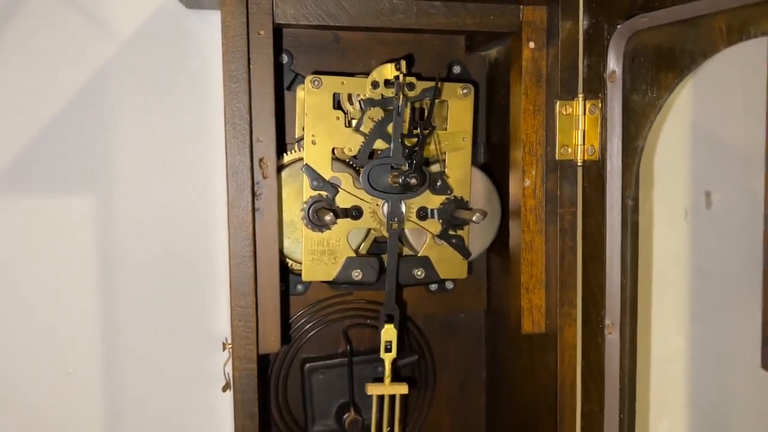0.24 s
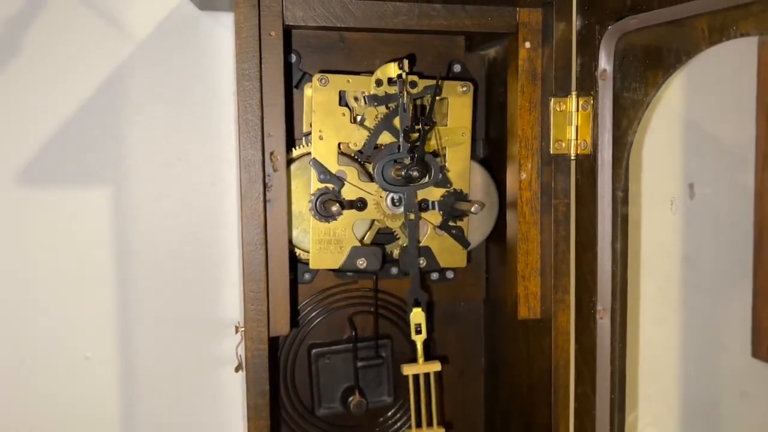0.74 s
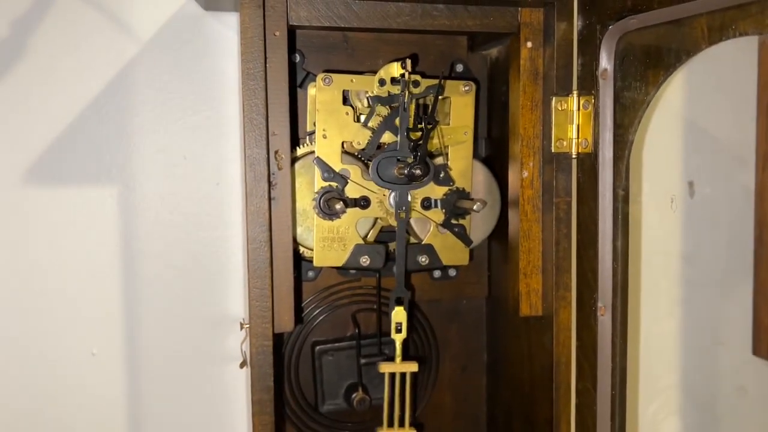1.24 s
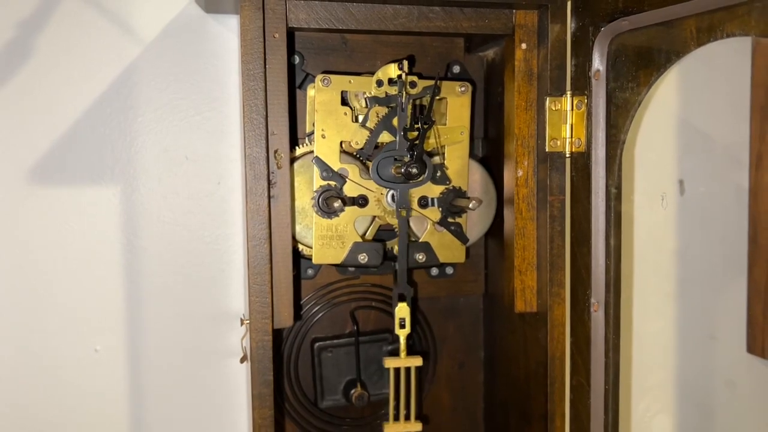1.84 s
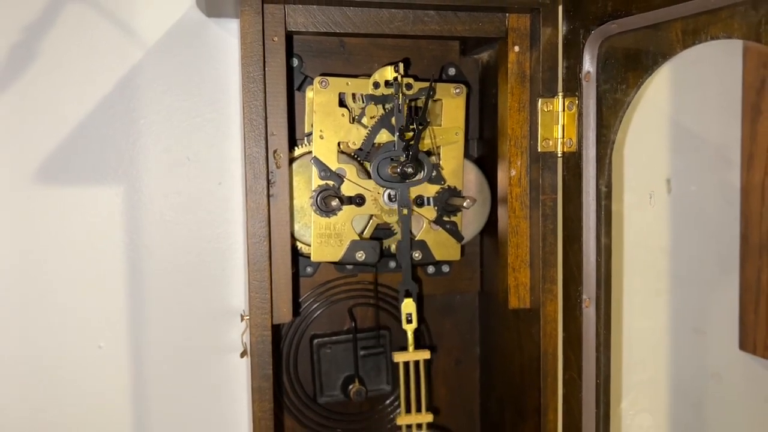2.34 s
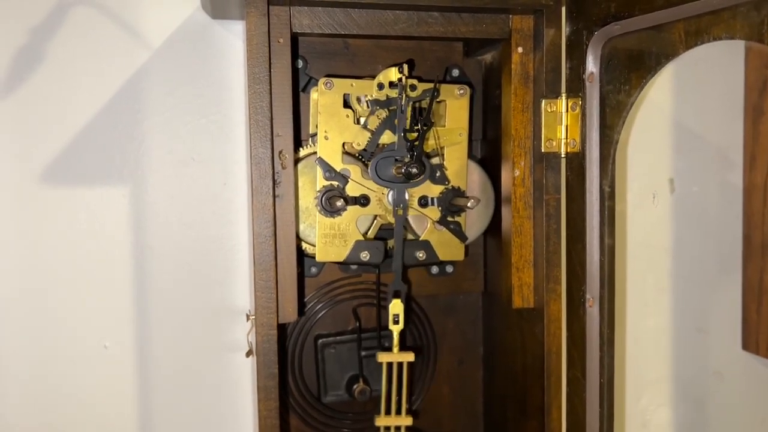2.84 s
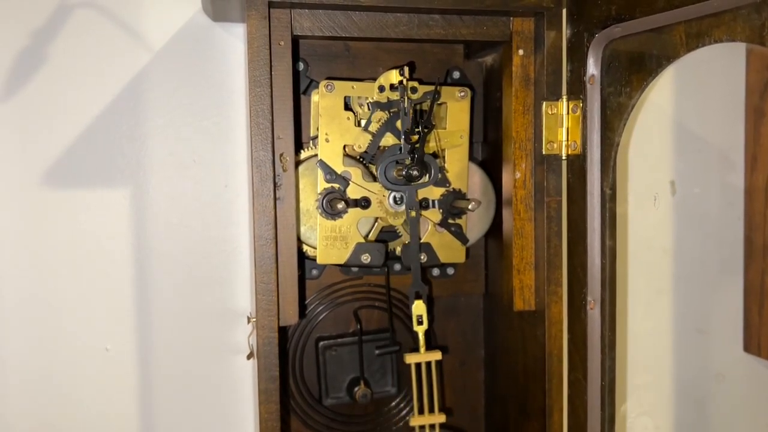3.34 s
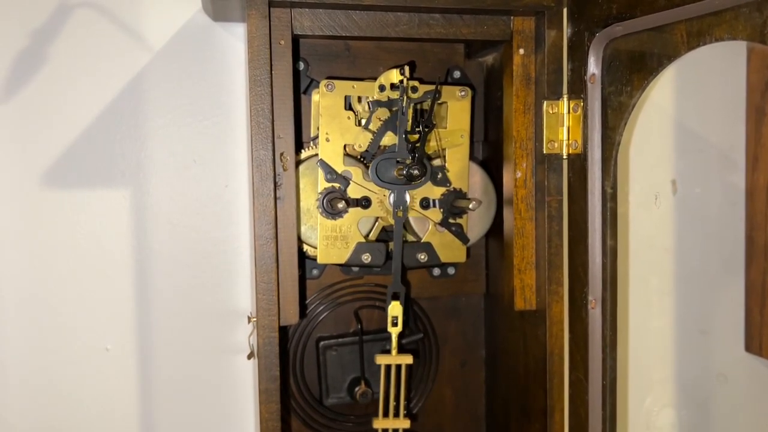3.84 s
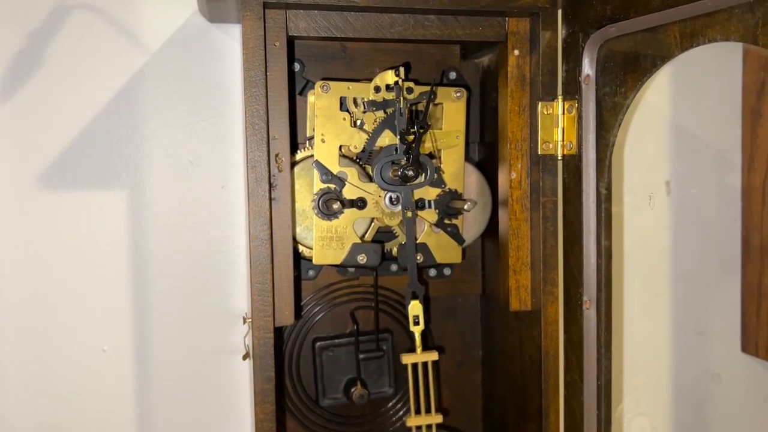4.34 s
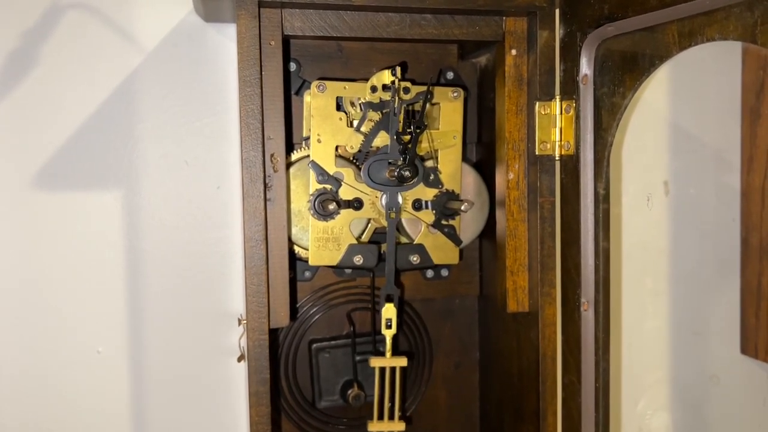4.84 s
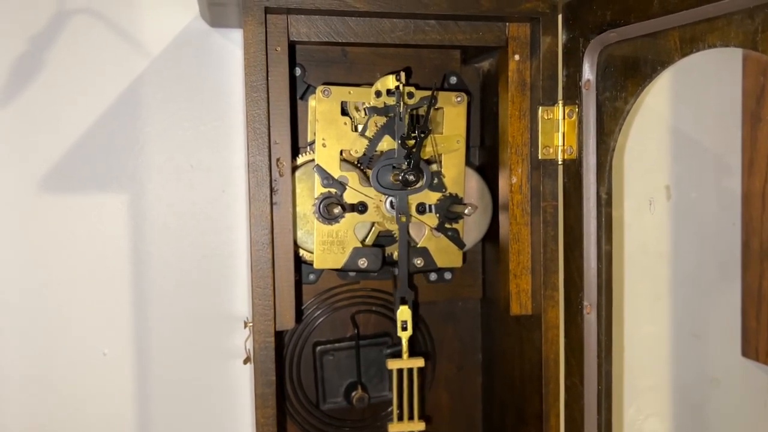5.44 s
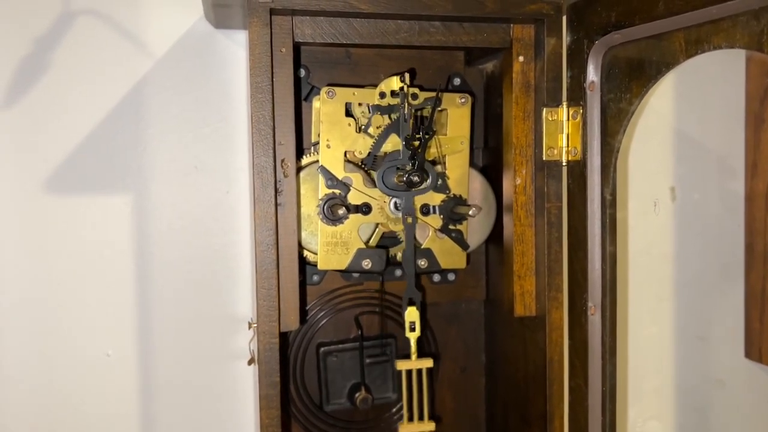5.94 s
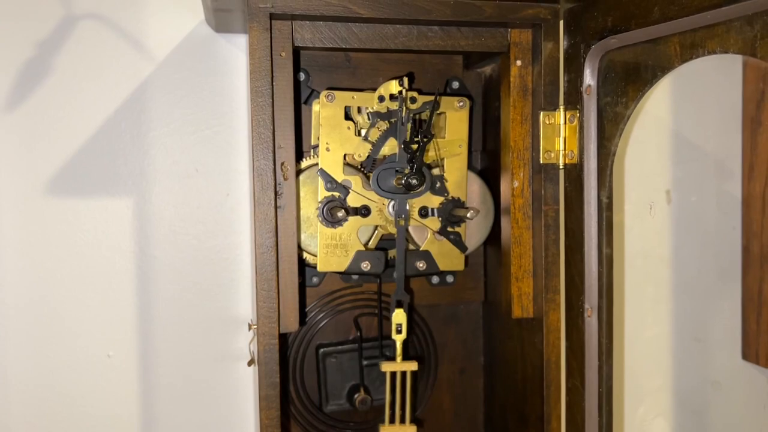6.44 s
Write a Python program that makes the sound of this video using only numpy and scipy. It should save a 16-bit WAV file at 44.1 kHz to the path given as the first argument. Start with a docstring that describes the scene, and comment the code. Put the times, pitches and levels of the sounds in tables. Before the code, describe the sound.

A wall clock strikes four evenly spaced ringing blows on a coiled wire gong, over a mechanical whirr, faint ticking and light clicks, close indoors.

```python
"""A pendulum wall clock strikes on a coiled wire gong, heard close by in a small room.
At first the last blow still rings, in slowly beating pairs of modes, over the steady whirr of the strike train.
Loose parts and pins ping at times, the escapement ticks, and a wheel scrapes once a turn.
Four blows follow: each restarts the coil, knocks the wooden case, cracks and buzzes the wire.
After each, the strike lever drops with a click: noise plus the ring of one brass part."""
import sys
import numpy as np
from scipy import signal
from scipy.fft import rfft, irfft, next_fast_len
from scipy.io import wavfile
from scipy.ndimage import uniform_filter1d

SR = 44100
rng = np.random.default_rng(int(sys.argv[2]) if len(sys.argv) > 2 else 0)


def log_audio(samples):
    """Write samples as a 16-bit WAV file to the path given in sys.argv[1]."""
    # one column per channel
    frames = np.atleast_2d(samples).T
    # limit to full scale, then quantise
    limited = np.clip(frames, -1, 1)
    pcm = np.round(limited * 32767).astype(np.int16)
    wavfile.write(sys.argv[1], SR, pcm)


N = 295029

# Hammer blows; each makes one partial sing out and chokes others. Each row: start in seconds, strength in dB,
# brightness in dB per octave, singing pitch in Hz, its gain in dB, choked pitch in Hz, its gain in dB.
HAMMER_BLOWS = [(-1.21, -.6, .3, 1058, 3, 1868, -5), (.5670, -.1, .2, 5700, 7.5, 2550, -2.5),
                (2.3512, .3, .5, 4480, 5, 8000, -5), (4.1272, .5, 0, 1187, 3.5, 5900, -13),
                (5.9128, .7, 0, 5400, 4, 1150, -4)]
# Escapement beats. Each row: start in seconds, relative strength in dB.
BEATS = [(.335, -28), (.90, -31), (1.456, -27), (2.049, -30), (3.159, -29), (3.689, -27), (4.807, -27),
         (5.404, -30), (6.52, -30)]
# Spectrum of mechanical clicks. Each row: frequency in Hz, relative level in dB per Hz.
CLICK_SPECTRUM = [(150, -14), (400, -2), (800, -4), (1300, 0), (2500, -6), (4500, -8), (8500, -8),
                  (10200, -20), (11500, -15), (13500, -32), (15200, -19)]


def gain_of(db):
    """Decibels to amplitude."""
    return 10 ** (np.asarray(db) / 20)


def read(points, hz):
    """Interpolates a spectrum table on a log-frequency axis."""
    points_hz, value = np.transpose(points)
    return np.interp(np.log(hz + 1), np.log(points_hz + 1), value)


def near(hz, centre_hz, octaves):
    """Gaussian in log frequency: 1 at the centre, falling away to either side."""
    return np.exp(-.5 * (np.log2(hz / centre_hz) / octaves) ** 2)


def add(mix, start_s, sound):
    """Mixes in a stereo sound, which may start before time zero."""
    at = round(start_s * SR)
    sound = sound[:, max(-at, 0):]
    part = mix[:, max(at, 0):][:, :sound.shape[1]]
    part += sound[:, :part.shape[1]]


def noise(spectrum, size):
    """Coloured stereo noise of rms 1, its bass nearly mono."""
    # Each row: frequency in Hz, left-right correlation.
    likeness = [(40, .85), (300, .9), (700, .6), (1500, .2), (15000, .1)]
    hz = np.fft.rfftfreq(size, 1 / SR)
    left, other = rfft(rng.standard_normal((2, size)))
    same = np.clip(read(likeness, hz), -1, 1)
    right = same * left + np.sqrt(1 - same ** 2) * other
    x = irfft(np.array([left, right]) * gain_of(read(spectrum, hz)), size)
    return x / x.std()


def dying(t_s, t60_s):
    """Exponential decay that loses 60 dB in t60_s."""
    return np.exp(-np.log(1000) * t_s / np.maximum(t60_s, 1e-3))


def fade_by_band(x, t60_points, rise_cycles=5, offset_hz=60):
    """Each frequency decays at its own speed; the bass builds up slowest."""
    hz, t_s, bands = signal.stft(x, SR, nperseg=256)
    rise = 1 - np.exp(-t_s * (hz[:, None] + offset_hz) / rise_cycles)
    decay = dying(t_s, read(t60_points, hz)[:, None])
    return signal.istft(bands * rise * decay, SR, nperseg=256)[1][:, :x.shape[1]]


def blow_drive_db(hz, strength_db, tilt_db, singing_hz, singing_db, choked_hz, choked_db):
    """How hard a blow drives the modes at hz: strength, tilt about a pivot, one peak and one dip."""
    pivot_hz, singing_octaves, choked_octaves = 1300, .04, .07
    tilt = tilt_db * np.log2(hz / pivot_hz)
    singing = singing_db * near(hz, singing_hz, singing_octaves)
    choked = choked_db * near(hz, choked_hz, choked_octaves)
    return strength_db + tilt + singing + choked


def coil(level_db=-.2, scatter_db=.8, scatter_turns=.04, rise_s=.006, stop_s=.008,
         waver=.05, waver_hz=2.5, block=128):
    """Wire gong as damped modes: each blow stops the old ring and restarts all; close pairs beat."""
    # Modes. Each row: frequency in Hz, level in dB before blow and trim, t60 in seconds,
    # left-right difference in dB, phase lead of the left channel in radians.
    modes = [(154.1, -52.9, 4.78, 0, 0.6), (196.9, -47.5, 6, -2, 0.3), (198.5, -52, 6.5, -2, 0.3),
             (244.9, -41.7, 4.91, 1, -0.1), (303.2, -32.8, 3.74, 0, 0.1), (312.4, -47.1, 3.41, -3, 0.1),
             (450.5, -51.8, 6.27, 10, 0.1), (456.7, -31, 1.4, 5, 0.3), (534.0, -37.4, 9.74, -1, 0.3),
             (623.1, -39.8, 11.32, 8, 0.5), (635.5, -31.9, 2.07, 14, -0.2), (720.4, -30.5, 17.17, 3, 0.8),
             (734.3, -27.7, 3.46, 4, -0.1), (824.7, -43.3, 10.83, 5, 0.0), (839.3, -25.3, 2.55, 1, 0.8),
             (934.3, -56.2, 15.2, -4, -1.1), (950.9, -41.9, 6.94, -15, 0.1),
             (1049.1, -42.6, 18.55, 6, -1.7), (1066.4, -26.7, 3.6, 5, 1.5), (1171.0, -52.6, 14.64, 4, 2.1),
             (1187.5, -32.8, 8.59, 0, 0.4), (1300.0, -38.5, 10.84, 10, 0.2), (1315.6, -24.2, 8.22, 18, 1.5),
             (1431.4, -37.6, 16.19, 9, 0.5), (1447.7, -34.5, 7.06, 8, 2.4), (1571.2, -40.7, 6.53, -2, -1.0),
             (1588.5, -31.4, 5.29, 8, 2.5), (1714.5, -40.9, 7.66, 7, -0.3), (1731.7, -29.1, 10.32, 9, 2.4),
             (1860.2, -29.1, 7.51, 0, 0.2), (1879.3, -43.3, 12.94, -6, -0.1),
             (2011.3, -34.5, 5.25, -2, -2.0), (2032.1, -39.6, 8.4, -3, -2.3),
             (2167.3, -33.2, 7.18, 3, -1.2), (2190.8, -41.2, 7.3, 5, 1.9), (2325.7, -42.8, 7.07, -2, 0.7),
             (2352.7, -52.0, 8.49, -2, -1.9), (2487.8, -45.6, 3.57, 0, -0.7), (2519.5, -38.7, 5.05, 1, 0.2),
             (2653.7, -40.9, 4.03, 1, 0.4), (2689.8, -46.5, 8.81, -2, 1.6), (2824.1, -38.9, 3.75, 0, 1.1),
             (2864.4, -55.0, 6.2, -2, 0.0), (3001.0, -42.7, 4.83, 5, 1.3), (3044.7, -48.9, 7.08, 1, 2.1),
             (3184.8, -48.1, 4.31, -3, -2.3), (3230.6, -52.1, 7.24, -3, -2.8),
             (3376.9, -41.3, 3.8, -3, 1.3), (3423.9, -55.0, 5.58, -4, 2.0), (3576.4, -51.3, 5.85, -1, -1.7),
             (3624.1, -52.5, 7.61, -2, 1.7), (3780.8, -52.5, 4.45, -7, 0.3), (3828.9, -48.8, 5.81, 11, 0.9),
             (3993.2, -51.0, 4.12, -2, -1.8), (4211.8, -51.4, 3.51, -5, -2.8), (4436.1, -36, 3.5, 0, 0.0),
             (4481.9, -53.5, 4.81, 1, 0.0), (4667.7, -33.9, 2.29, 7, 0.8), (4712.0, -48.2, 3.73, 6, 0.6),
             (4904.4, -26, 0.85, 10, 0.7), (4947.6, -48.5, 3.08, 7, 2.0), (5146.8, -26, 1.0, 7, 1.5),
             (5186.1, -45.9, 2.52, 16, -0.2), (5388.9, -29.5, 1.7, 5, 0.5), (5426.8, -41.4, 2.49, 13, 1.1),
             (5636.2, -31.1, 2.24, 14, 3.0), (5671.5, -47.6, 2.92, 9, -1.4), (5885.9, -33, 1.8, 9, -2.2),
             (5917.8, -51.3, 3.6, 10, -0.7), (6139.3, -43.6, 2.52, 3, 0.7), (6396.3, -39.6, 2.37, 3, -3.0),
             (6424.3, -53.0, 2.93, 12, -1.9), (6651.3, -52.5, 2.93, 4, 0.6), (6910.4, -44.6, 2.24, 7, 0.4),
             (6943.8, -53.0, 2.86, 10, 1.4), (7173.7, -55.1, 2.86, 4, 2.0), (7445.6, -28, 0.4, 0, -0.5),
             (7488.4, -35, 0.6, 0, 0.2), (7728.9, -35, 1.0, 2, 0.2), (7777, -38, 0.75, 2, 0.8),
             (8017.2, -53.7, 2.42, 1, 1.0), (8316.3, -46.5, 2.12, 2, 0.4), (8619.8, -47.0, 2.13, -2, -0.5),
             (8929.9, -52.8, 2.25, 7, -1.8), (9246.0, -53.9, 2.48, 3, -1.2),
             (9569.4, -48.8, 2.43, -2, -2.2), (9895.5, -42, 1.8, 0, -2.7), (10224.7, -47.1, 1.65, 0, 3.1),
             (10547.1, -48.5, 1.85, 1, 2.7), (10846.7, -44.1, 1.49, 1, 2.1), (11105.0, -47.9, 1.67, 0, 1.5),
             (11377.8, -49.0, 1.7, -1, 1.0), (11687.4, -50.6, 1.24, 1, 0.3), (12033.1, -37.3, 0.84, 0, 0.0),
             (12065.9, -55.0, 1.1, 0, 0.0), (14662.8, -34, 0.31, 1, 1.8), (14860, -37, 0.22, 0, 0.8),
             (15030, -33, 0.2, 1, 0.7)]
    hz, mode_db, t60_s, pan_db, lead_rad = np.transpose(modes)

    # wire swings in and across the coil's plane: twin modes start in opposite phase
    twin = np.append(False, np.diff(hz) < np.minimum(72, hz[1:] / 32))
    pair = np.cumsum(~twin) - 1
    start_turns = rng.random(len(hz))[pair] + twin / 2

    level = gain_of(np.array([pan_db, -pan_db]) / 2)
    stereo = level * np.exp(.5j * np.array([lead_rad, -lead_rad]))
    stereo /= np.sqrt(np.mean(abs(stereo) ** 2, 0))

    # damped rotation = state at block start x course within the block
    pole = 2j * np.pi * hz - np.log(1000) / t60_s
    block_s = np.arange(0, 2 * SR, block)[:, None] / SR
    state = np.exp(pole * block_s)
    course = np.exp(pole[:, None] * np.arange(block) / SR)

    t_s = np.arange(len(block_s) * block) / SR
    out = np.zeros((2, N))
    starts_s = [row[0] for row in HAMMER_BLOWS]
    for (start_s, *blow), next_s in zip(HAMMER_BLOWS, starts_s[1:] + [N / SR + 1]):
        louder, earlier, speed, offset = rng.standard_normal((len(hz), 4)).T
        amplitude = gain_of(level_db + mode_db + blow_drive_db(hz, *blow) + scatter_db * louder)
        swing = amplitude * np.exp(2j * np.pi * (start_turns + scatter_turns * earlier))
        # each partial wavers at its own random rate
        drift = 1 + waver * np.sin(2 * np.pi * (waver_hz * speed * block_s + offset))
        ring = ((stereo[:, None] * (swing * state * drift)) @ course).real.reshape(2, -1)
        rise = 1 - np.exp(-t_s / rise_s)
        stop = np.exp(-np.maximum(t_s - (next_s - start_s), 0) / stop_s)
        add(out, start_s, ring * rise * stop)
    return out


def train(whirr_db=-48.6, flutter_db=.7, teeth_db=-61.5, teeth_per_s=70, spread_db=2.5, tooth_t60_s=.03):
    """Wheels and air brake whirr as slowly fluttering noise; gear teeth patter at random."""
    # Each row: frequency in Hz, relative level in dB per Hz.
    whirr_spectrum = [(25, -23), (55, -6), (90, -2), (220, -5), (400, -8), (750, -2), (1200, 0), (1800, -1),
                      (2400, -5), (3300, -11), (5200, -11), (7500, -17.5), (9300, -20), (10500, -31),
                      (13000, -41), (15300, -31)]
    size = next_fast_len(N)
    flutter = rng.standard_normal(N)
    for _ in range(2):
        flutter = uniform_filter1d(flutter, size=1500)
    flutter /= flutter.std()
    whirr = noise(whirr_spectrum, size)[:, :N] * gain_of(whirr_db + flutter_db * flutter)

    hits = rng.random(N) < teeth_per_s / SR
    taps = hits * gain_of(spread_db * np.minimum(rng.exponential(1, N), 3))
    envelope = signal.oaconvolve(taps, dying(np.arange(SR // 10) / SR, tooth_t60_s))[:N]
    patter = envelope * noise(CLICK_SPECTRUM, size)[:, :N]
    return whirr + gain_of(teeth_db) * patter / patter.std()


def click(level_db, hz, ring_db, t60_s, ring_width_hz=250, rise_s=.001):
    """Burst of rattle noise plus noise through the resonance of one brass part."""
    t_s = np.arange(SR // 4) / SR
    resonance = signal.iirpeak(hz, hz / ring_width_hz, SR)
    ring = signal.lfilter(*resonance, rng.standard_normal((2, len(t_s))))
    burst = noise(CLICK_SPECTRUM, len(t_s)) + gain_of(ring_db) * ring / ring.std()
    return gain_of(level_db) * burst * dying(t_s, t60_s) * (1 - np.exp(-t_s / rise_s))


def works():
    """Movement as clicks: loose brass, pins, escapement, strike lever, and a wheel scraping once a turn."""
    # Loose brass parts. Each row: start in seconds, rattle level in dB, pitch in Hz,
    # ring in dB above the rattle, t60 in seconds.
    pings = [(.051, -54, 2650, 17, .1), (.520, -44, 4600, -4, .06), (1.334, -47, 5000, -4, .06),
             (1.428, -45, 4900, 2, .06), (1.875, -52, 2700, 13, .05), (2.324, -47, 7500, -4, .06),
             (3.882, -60, 4000, 27, .028), (3.883, -60, 4800, 29, .028), (5.510, -50, 4800, 0, .05)]
    # Strike lever drops. Each row: start in seconds, level in dB.
    lever_drops = [(.829, -31), (2.619, -31), (4.407, -31), (6.193, -32)]
    pins_per_s = 1
    scrape_first_s, wheel_turn_s = 1.770, 1.9975
    pallet_db = -17  # relative to beat strength

    out = np.zeros((2, N))
    for start_s, *ping in pings:
        add(out, start_s, click(*ping))
    for start_s in np.flatnonzero(rng.random(N) < pins_per_s / SR) / SR:
        add(out, start_s, click(-53, hz=8000, ring_db=-8, t60_s=.06))
    for start_s, beat_db in BEATS:
        add(out, start_s, click(beat_db + pallet_db, hz=7900, ring_db=-8, t60_s=.07))
    for start_s, drop_db in lever_drops:
        add(out, start_s, click(drop_db, hz=8100, ring_db=-8, t60_s=.13))
    for start_s in np.arange(scrape_first_s, N / SR, wheel_turn_s):
        add(out, start_s, click(-48, hz=8200, ring_db=-6, t60_s=.14))
    return out


def case(blow_db=.9, beat_trim_db=3.5, rise_cycles=1.2, pan_db=2.5):
    """Wooden panels as damped sines: a faint thump at each listed beat, a knock under each blow."""
    # Panel modes. Each row: frequency in Hz, relative level in dB, t60 in seconds.
    panel_modes = [(125, -45, .9), (172, -36, .25), (338, -21, .14), (362, -21, .2), (381, -36, 1.0),
                   (432, -20, .11), (516, -21, .16), (549, -23, .32)]
    t_s = np.arange(SR) / SR
    # panels start together; close modes beat into a short throb
    panels = []
    for hz, mode_db, t60_s in panel_modes:
        rise = 1 - np.exp(-t_s * hz / rise_cycles)
        panels.append(gain_of(mode_db) * dying(t_s, t60_s) * rise * np.sin(2 * np.pi * hz * t_s))
    panels = np.array(panels)
    # escapement shakes mainly panels near 385 Hz
    thump = near(np.transpose(panel_modes)[0], 385, octaves=.3) @ panels
    knock = panels.sum(0)

    pan = gain_of([[pan_db / 2], [-pan_db / 2]])
    out = np.zeros((2, N))
    for start_s, beat_db in BEATS:
        add(out, start_s, gain_of(beat_db + beat_trim_db) * thump * pan)
    for start_s, *_ in HAMMER_BLOWS:
        add(out, start_s, gain_of(blow_db) * knock * pan)
    return out


def hammer(crack_db=-24, crack_t60_s=.095, buzz_db=-32.4, pan_db=2):
    """Noise bursts per blow: short crack of contact, longer buzz of the wire against its mount."""
    # Each row: frequency in Hz, relative level in dB per Hz.
    crack_spectrum = [(100, -26), (400, -3), (1000, -2), (1900, -3), (3600, -13), (5200, -3), (7500, -4),
                      (10200, -20), (12500, -7), (13800, -13), (14800, 1), (16000, -15)]
    # Each row: frequency in Hz, relative level in dB per Hz.
    buzz_spectrum = [(25, -28), (60, -7), (130, -6), (300, -7), (500, -8), (720, -1), (1000, -5),
                     (1800, -3), (3600, -17), (5200, -8), (6600, -15), (7600, -10), (10000, -20),
                     (11500, -14), (13500, -30), (15000, -19)]
    # Each row: frequency in Hz, t60 in seconds.
    buzz_t60 = [(80, 1.3), (400, .7), (1500, 1.3), (5000, 1.1), (9000, .9), (15000, .4)]
    crack_decay = dying(np.arange(SR // 4) / SR, crack_t60_s)
    out = np.zeros((2, N))
    for start_s, *_ in HAMMER_BLOWS:
        crack = noise(crack_spectrum, SR // 4) * crack_decay
        buzz = fade_by_band(noise(buzz_spectrum, SR), buzz_t60)
        add(out, start_s, gain_of(crack_db) * crack)
        add(out, start_s, gain_of(buzz_db) * buzz)
    return out * gain_of([[pan_db / 2], [-pan_db / 2]])


def room(x, delay_s=.006):
    """Short diffuse tail: convolution with white noise decaying by band."""
    # Each row: frequency in Hz, t60 in seconds.
    tail_t60 = [(100, .5), (1000, .45), (5000, .35), (15000, .2)]
    size = SR // 2
    tail = fade_by_band(noise([(20, 0), (20000, 0)], size), tail_t60)
    tail *= np.arange(size) / SR > delay_s
    return signal.fftconvolve(x, tail / np.linalg.norm(tail[0]), axes=1)[:, :N]


def scene(wet_db=-10):
    """Gong, strike train, movement, case and hammer; the room answers the last three."""
    knocks = works() + case() + hammer()
    return coil() + train() + knocks + gain_of(wet_db) * room(knocks)


def record(dry, edge_hz=15900):
    """Band limit: linear-phase low-pass."""
    lowpass = signal.firwin(511, edge_hz, window=("kaiser", 9), fs=SR)
    return signal.oaconvolve(dry, lowpass[None], "same")


dry = scene()
out = record(dry)
log_audio(out)
```